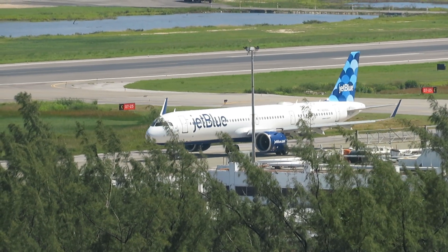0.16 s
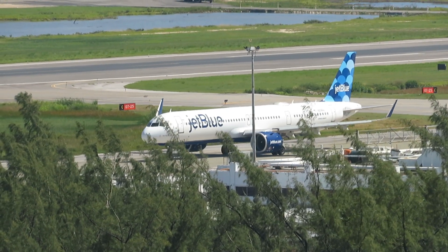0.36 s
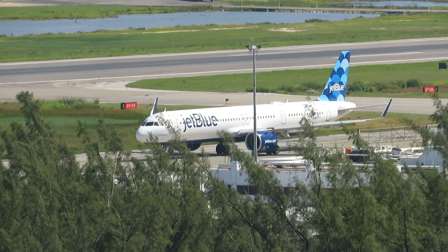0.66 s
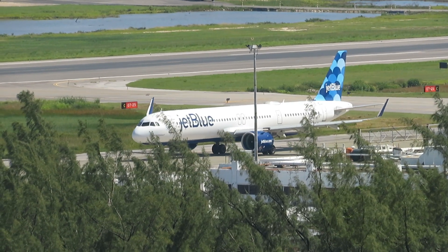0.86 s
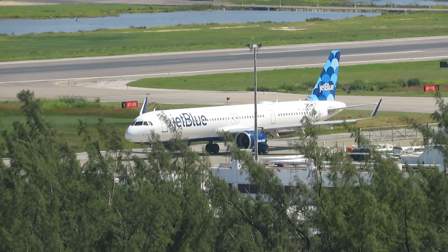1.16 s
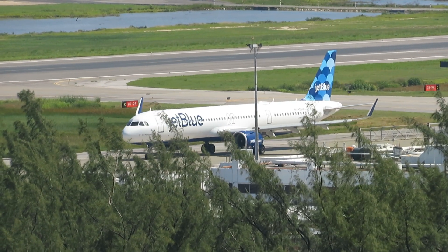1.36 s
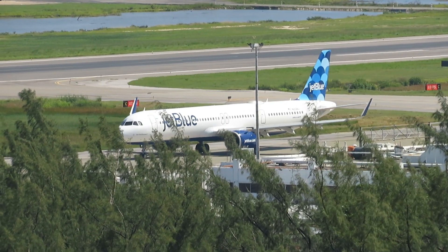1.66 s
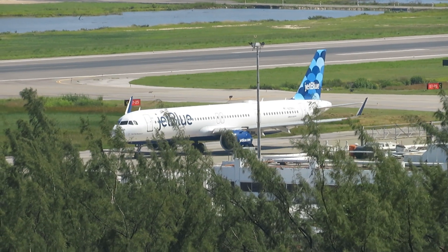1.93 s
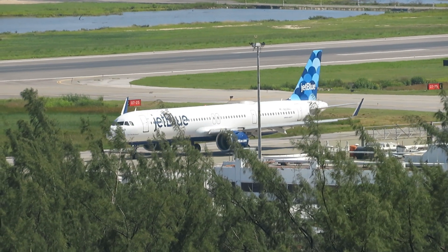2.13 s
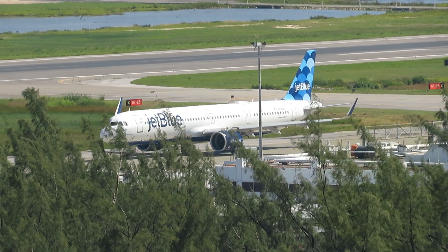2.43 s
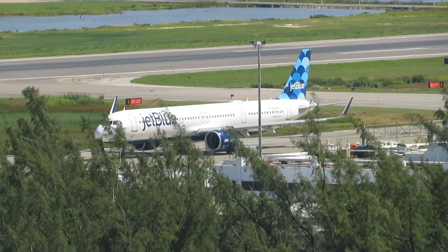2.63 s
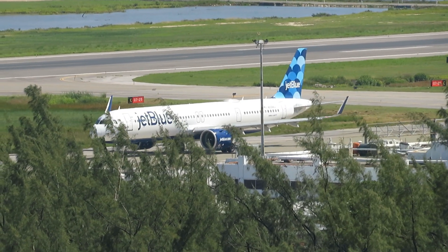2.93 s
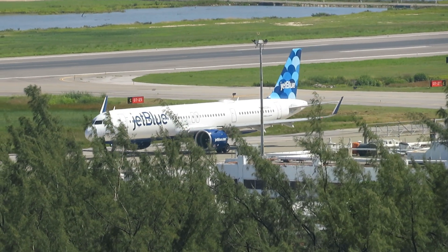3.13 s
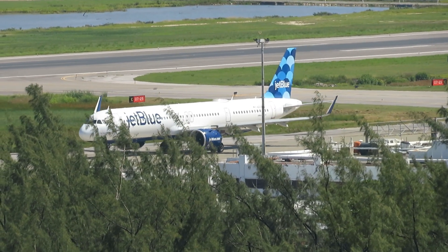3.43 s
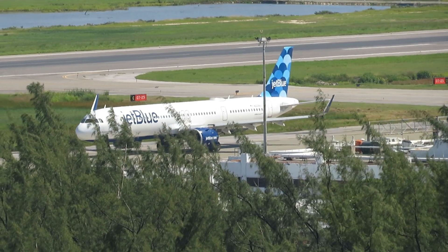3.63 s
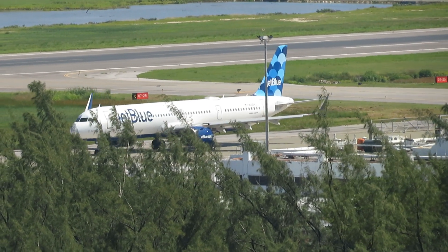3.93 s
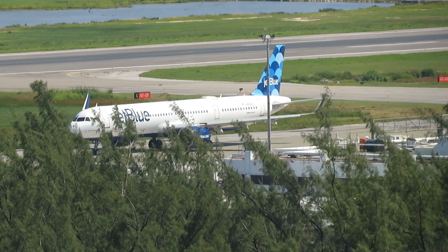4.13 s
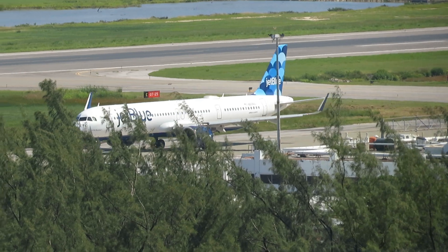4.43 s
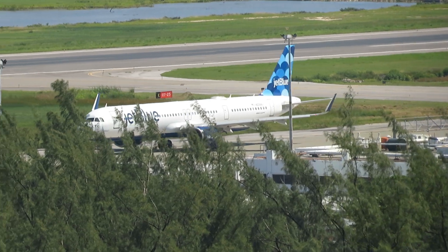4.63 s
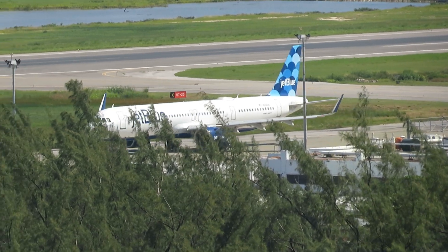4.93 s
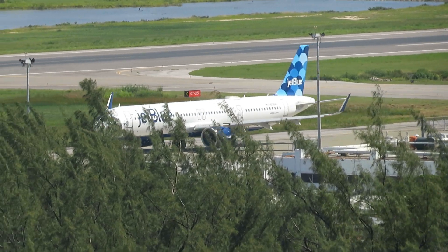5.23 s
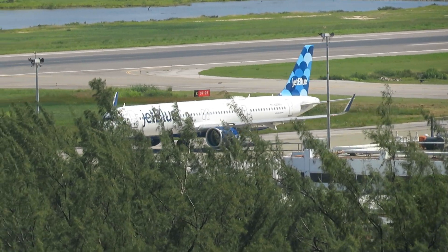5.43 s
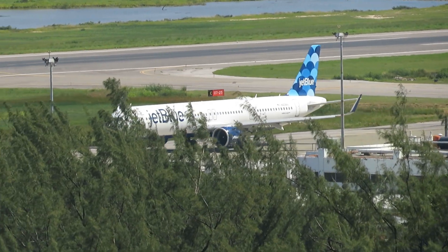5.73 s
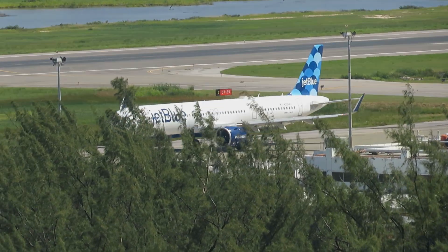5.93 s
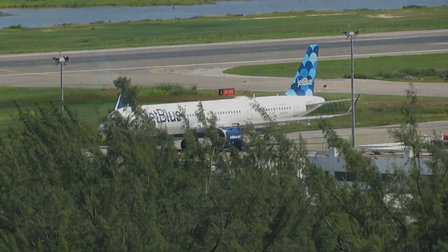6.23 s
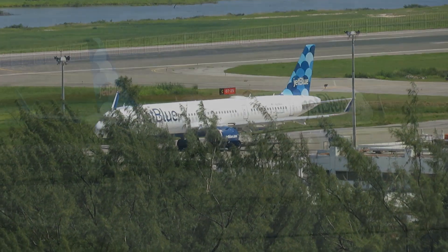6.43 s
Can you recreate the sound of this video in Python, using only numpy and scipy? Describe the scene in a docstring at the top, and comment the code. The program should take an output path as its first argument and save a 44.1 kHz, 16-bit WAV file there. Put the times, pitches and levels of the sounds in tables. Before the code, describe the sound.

Outdoors at some distance, a passenger jet rolls by with its engines running. Low humming drone, fluttering whine and thin breathy whistles blend with turbulent roar and broad hiss. The sound swells as the plane passes, briefly brightens with rushing air, then grows deeper and weaker as it moves off. Brief low wind thumps touch the stereo microphone.

```python
"""A deep engine drone and a fan whine, set in turbulent roar and wide hiss: an airliner taxis
across an airfield, heard from behind a line of trees. Drone and whine are sums of orders of one
unsteady shaft and sink in pitch as the sound moves off. Rumble, roar, rush, hiss and whistles are
shaped noise that swells and fades; puffs of very low noise are wind bumping the microphone."""
import sys
import numpy as np
from scipy import signal
from scipy.fft import rfft, irfft, next_fast_len
from scipy.io import wavfile

SR = 44100
rng = np.random.default_rng(int(sys.argv[2]) if len(sys.argv) > 2 else 0)


def persist_wave(psi):
    """Save psi, clipped to +-1, as 16-bit WAV."""
    counts = np.round(np.clip(psi, -1, 1) * 32767).astype(np.int16)
    wavfile.write(sys.argv[1], SR, np.atleast_2d(counts).T)


N = 289737
TIME = np.arange(N) / SR
SIZE = next_fast_len(N, real=True)
FREQ = np.maximum(np.arange(SIZE // 2 + 1) * SR / SIZE, 1)
OPPOSED = np.array([[1], [-1]])  # left, right in antiphase


def undb(db):
    """Decibels to gain."""
    return 10 ** (np.asarray(db) / 20)


def curves(table):
    """Columns of a table of timed rows, interpolated to one value a sample."""
    t_s, *columns = np.transpose(table)
    return [np.interp(TIME, t_s, column) for column in columns]


def across(points):
    """(f/Hz, value) points joined on a log-frequency axis."""
    hz, value = np.transpose(points)
    return np.interp(np.log(FREQ), np.log(np.sort(hz)), value)


def bell(hz, sigma_hz):
    """Gaussian of height 1 on the frequency axis."""
    return np.exp(-.5 * ((FREQ - hz) / sigma_hz) ** 2)


def pulse(t_s, sigma_s):
    """Gaussian of height 1 on the time axis."""
    return np.exp(-.5 * ((TIME - t_s) / sigma_s) ** 2)


def unit(x):
    """Scale to rms 1."""
    return x / np.std(x)


def white():
    """Spectrum of fresh white noise."""
    return rfft(rng.standard_normal(SIZE))


def filtered(spectrum, gain):
    """Waveform of a spectrum times a gain."""
    return irfft(spectrum * gain, SIZE)[:N]


def colour(spectrum, shape_db):
    """Waveform of a spectrum weighted in dB, rms 1."""
    return unit(filtered(spectrum, undb(shape_db)))


def walk(rate_hz):
    """Smooth random curve of Gaussian bandwidth rate_hz, spread 1."""
    count = 4096
    spectrum = rfft(rng.standard_normal(count))
    hz = np.arange(len(spectrum)) / TIME[-1]
    slow = irfft(spectrum * np.exp(-.5 * (hz / rate_hz) ** 2))
    return np.interp(TIME, np.linspace(0, TIME[-1], count), unit(slow))


def tone(phase, scatter, rate_hz):
    """Line arriving directly and by shifting paths that blur its level and phase."""
    blur = scatter * (walk(rate_hz) * np.sin(phase) + walk(rate_hz) * np.cos(phase))
    return (np.sqrt(2) * np.sin(phase) + blur) / np.sqrt(1 + scatter ** 2)


def breathy(hz, sigma_hz):
    """Noise band around a centre that may move: low noise on two quadrature carriers, rms 1."""
    phase = 2 * np.pi * np.cumsum(hz) / SR
    a, b = (unit(filtered(white(), bell(0, sigma_hz))) for _ in range(2))
    return a * np.sin(phase) + b * np.cos(phase)


def eddies(spectrum, shape_db, swell_db, flicker_db):
    """Turbulent noise that swells slowly and flickers as the air moves."""
    return colour(spectrum, shape_db) * undb(swell_db * walk(1.0) + flicker_db * walk(8.2))


def flares(table):
    """Noise bands that swell and sink, drifting a little in pitch."""
    total = 0
    for t_s, sigma_s, hz, sigma_hz, level_db in table:
        band = breathy(hz * (1 + .008 * walk(2.2)), sigma_hz)
        total = total + undb(level_db) * pulse(t_s, sigma_s) * band
    return total


# beaming per layer: top/dB, rise/(dB/s), top reached t/s, top left t/s, fall/(dB/s)
LAYER_BEAMS = { "throb": (-39, 2, 0, 1.5, 9), "fourth": (-32, 5, 0, 3.5, 3),
               "rumble": (-22, 1, 1.98, 3.5, 3), "abeam": (-40.5, 20, 4, 5.5, 8),
               "wake": (-35.5, 5.5, 4.5, 7, 9), }


def beam(name):
    """Level of a beamed layer in dB: rise, hold and fall, then a fade common to these layers."""
    top_db, rise, reached_s, left_s, fall = LAYER_BEAMS[name]
    fade_s, fade_db_per_s = 5.76, 10
    level_db = top_db - rise * np.maximum(reached_s - TIME, 0) - fall * np.maximum(TIME - left_s, 0)
    return level_db - fade_db_per_s * np.maximum(TIME - fade_s, 0)


# wind bumps on the microphone: t/s, level/dB, sigma/s
WIND_BUMPS = [(0.386, -36.5, 0.057), (2.018, -29, 0.077), (3.634, -27.5, 0.041), (3.98, -33.5, 0.027)]


def wind():
    """Short soft puffs of very low noise."""
    puffs = sum(undb(level_db) * pulse(t_s, sigma_s) for t_s, level_db, sigma_s in WIND_BUMPS)
    shape_db = across([(12, -6.5), (30, 0.5), (55, 13.0), (120, -17), (400, -71)])
    return puffs * colour(white(), shape_db)


# faint high noise band: f/Hz, relative density/dB
HIGH_BAND_SHAPE = [(6000, -24), (9500, -2), (11000, 1), (12500, -17)]


def high_band():
    """Faint high noise band, about 9 to 11 kHz, swelling near 5.5 s."""
    return undb(-68) * pulse(5.55, .4) * colour(white(), across(HIGH_BAND_SHAPE))


# aspect: t/s, 0 coming - 1 leaving, wide hiss over centre hiss curve/dB
ASPECT_CURVE = [(0, 0, 13.5), (3.6, 0, 15.5), (4.2, 0.63, 16.5), (4.8, 0.81, 18), (5.5, 1, 13.5),
                (6.57, 0.99, 15.5)]


def leaving_share():
    """Share of the leaving colour, 0 coming to 1 leaving."""
    return np.clip(curves(ASPECT_CURVE)[0], 0, 1)


# rush of air: f/Hz, relative density/dB
RUSH_SHAPE = [(500, -23), (850, -3), (1100, 2.5), (1350, -1.5), (1850, -6.5), (2300, -9.5), (3200, -20),
              (3850, -18), (4400, -38.5), (7000, -87), (12000, -83)]
# resonances: f/Hz, sigma coming/Hz, sigma leaving/Hz, lift coming/dB, lift leaving/dB
RUSH_RESONANCES = [(1470, 70, 250, 4, 6), (2163, 390, 175, 1.5, 11.5), (2700, 163, 98, 9, -12.5),
                   (3060, 93, 90, 8, -10), (3400, 70, 180, 7, 4.5)]
# rush: t/s, level before trim/dB
RUSH_CURVE = [(0, -31.5), (.5, -33), (1.5, -31.5), (1.8, -34), (2.35, -31), (2.85, -30), (3.2, -27.5),
              (3.9, -26), (4.3, -30), (4.8, -33), (5.4, -36.5), (5.7, -42.5), (6.57, -49.5)]
# centre hiss: f/Hz, relative density/dB
HISS_SHAPE = [(1500, -11.5), (3000, 8), (3800, 8.5), (4500, 3.5), (5800, 6.5), (7000, 3), (8300, 0),
              (9500, -5.5), (11000, -24), (13000, -39)]
# hiss: t/s, level before trim/dB
HISS_CURVE = [(0, -53.5), (1.45, -49.5), (1.9, -51.5), (2.5, -50.5), (3.3, -52), (3.95, -51), (4.4, -54.5),
              (5, -55.5), (5.4, -53), (5.7, -59), (6, -64.5), (6.57, -76)]
# treble differing between the ears, coming and leaving: f/Hz, relative density/dB
WIDE_SHAPE_COMING = [(1300, -57), (2050, -14.5), (2300, -9), (2420, -6), (2600, -1.5), (2820, -1),
                     (3050, -6), (3300, -6.5), (3620, -9.5), (3880, -3.5), (4150, 1), (4450, -2),
                     (4700, -1.5), (4980, 2), (5280, -13), (5550, -4), (6150, -10), (6700, -8),
                     (7300, -16.5), (9300, -16), (12500, -46.5)]
WIDE_SHAPE_LEAVING = [(1600, -56.5), (2100, -9.5), (2350, -2), (2600, -8), (2850, 3), (3250, -4),
                      (3700, -13), (4250, -5), (4600, -15.5), (4950, 1), (5500, -3.5), (5900, -12),
                      (6400, -15.5), (9000, -20), (11000, -35), (12500, -39)]
# phase turn of the centre's noise for the wide treble: f/Hz, phase/rad
WIDE_PHASE_CURVE = [(2550, -2.5), (2830, 3.5), (3000, -6), (3250, 4.5), (3480, 0), (3750, -2), (4600, 4),
                    (5500, -1.94), (10000, -1.53)]


def rush():
    """Resonant rushing air and hiss as (centre, side), changing colour with aspect."""
    hiss_db, = curves(HISS_CURVE)
    rush_db, = curves(RUSH_CURVE)
    wide_db = curves(ASPECT_CURVE)[1]
    leaving = leaving_share()
    noise = white()
    coming_db = sum(db * bell(hz, sigma) for hz, sigma, _, db, _ in RUSH_RESONANCES)
    leaving_db = sum(db * bell(hz, sigma) for hz, _, sigma, _, db in RUSH_RESONANCES)
    front = colour(noise, across(RUSH_SHAPE) + coming_db)
    rear = colour(noise, across(RUSH_SHAPE) + leaving_db)
    centre = undb(rush_db + 1.0) * ((1 - leaving) * front + leaving * rear)
    centre += undb(hiss_db + 4.0) * colour(noise, across(HISS_SHAPE))
    # the centre's noise with its phase turned by frequency, plus independent noise
    turned = noise * np.exp(1j * across(WIDE_PHASE_CURVE)) + .9 * white()
    wide = (1 - leaving) * colour(turned, across(WIDE_SHAPE_COMING))
    wide += leaving * colour(turned, across(WIDE_SHAPE_LEAVING))
    side = undb(hiss_db + wide_db) * wide * OPPOSED
    flutter = undb(.5 * walk(22) + 0.63 * walk(9.4))
    return centre * flutter, side * flutter


# exhaust rumble, roar and swell abeam: f/Hz, relative density/dB
RUMBLE_SHAPE = [(20, -28), (45, -21), (95, -7), (130, -7), (200, -2), (260, -1.5), (330, -2.5), (420, -6),
                (600, -18.5), (1200, -81), (5000, -110)]
ROAR_SHAPE = [(250, -10.5), (400, 1.5), (500, -4), (700, -0.5), (850, -2), (1000, -12), (1400, -29.5),
              (3000, -89.5), (8000, -100)]
ABEAM_SWELL_SHAPE = [(200, -31.5), (550, -18), (950, -2), (1300, -2.5), (1850, -11), (2700, -18.5),
                     (3600, -31.5), (4400, -17.5), (9000, -81.5)]
# roar: t/s, level before trim/dB
ROAR_CURVE = [(0, -25.5), (.8, -24.5), (1.8, -26.5), (2.15, -24.5), (2.75, -31), (3.45, -26.5), (4, -23),
              (4.5, -29), (5.1, -31), (5.6, -35.5), (6.57, -44.5)]


def exhaust():
    """Turbulent exhaust noise, brighter abeam and deeper from behind."""
    rumble = undb(beam("rumble") + .4) * eddies(white(), across(RUMBLE_SHAPE), 0.16, 1.24)
    roar = undb(curves(ROAR_CURVE)[0] + 3.5) * eddies(white(), across(ROAR_SHAPE), 0.24, 0.93)
    abeam = undb(beam("abeam")) * eddies(white(), across(ABEAM_SWELL_SHAPE), .16, 0.85)
    wake_shape_db = across([(40, -44.5), (80, -4.0), (115, 2.5), (145, -8.0), (190, -10.5),
                            (280, -19.0), (2000, -100)])
    wake = undb(beam("wake")) * colour(white(), wake_shape_db)
    return rumble + roar + abeam + wake


# valleys in the approaching noise: f/Hz, sigma/Hz, gain/dB
NOISE_VALLEYS = [(664, 16, -3.5), (1340, 31, -3), (1845, 20, -7.5), (2300, 20, -3), (3000, 25, 0),
                 (3310, 50, -3.5), (4450, 110, -5)]


def hollow(x):
    """Narrow spectral valleys colour the noise while the engine comes and fill in as it leaves."""
    leaving = leaving_share()
    valley_db = sum(db * bell(hz, sigma_hz) for hz, sigma_hz, db in NOISE_VALLEYS)
    carved = filtered(rfft(x, SIZE), undb(valley_db))
    return (1 - leaving) * carved + leaving * x


# exhaust lumps: t/s, sigma/s, f/Hz, sigma/Hz, level/dB
RUMBLE_LUMPS = [(.38, 0.053, 263, 8, -20.5), (.58, .03, 200.5, 12, -24), (.71, .035, 252, 13, -19.5),
                (.89, 0.016, 222, 15, -16), (1.68, .08, 260, 5.9, -19.5), (2.33, 0.044, 244.5, 20, -25),
                (2.62, 0.029, 225, 30, -22), (3.3, 0.049, 207.8, 12, -25), (3.75, 0.042, 197, 8.8, -22.5),
                (3.93, 0.024, 226.6, 17.3, -21.5), (4.11, 0.038, 238, 14, -22), (5.52, .04, 230, 10, -27.5)]


def lumps():
    """Brief narrow bands of low noise make the exhaust's rumble lumpy."""
    return flares(RUMBLE_LUMPS)


# rush resonances flaring as the engine turns: t/s, sigma/s, f/Hz, sigma/Hz, level/dB
RUSH_FLARES = [(1.3, 0.34, 1481, 45.4, -38.5), (1.52, 0.12, 3600, 80.2, -48), (1.55, 0.2, 3820, 90, -48),
               (2.5, 0.13, 3712, 180.9, -45.5), (3.168, 0.1, 2670, 132.3, -37),
               (3.468, 0.17, 3430, 74.6, -43), (5.42, 0.11, 3480, 90, -52), (5.42, 0.1, 3920, 89.7, -53)]
# brief surges of the wide hiss: t/s, sigma/s, f/Hz, sigma/Hz, level/dB
WIDE_SURGES = [(.9, .2, 6800, 170.5, -50), (1.47, .15, 4900, 200, -40), (1.62, .22, 4050, 120, -42),
               (2.55, 0.17, 4118, 110, -42), (3.22, 0.16, 4200, 120.3, -44.5),
               (4.02, 0.13, 3143, 230, -41.5), (5.27, 0.13, 3210, 190, -46)]


def resonance_flares():
    """Noise bands flare briefly: resonances in the centre, wide hiss in antiphase."""
    return flares(RUSH_FLARES) + flares(WIDE_SURGES) * OPPOSED


# airy whistle: t/s, mean f/Hz, mean level/dB
WHISTLE_CURVE = [(0, 2096, -43), (.2, 2070, -38.5), (.55, 2107, -38.5), (1.1, 2102, -37.5),
                 (1.43, 2105, -35), (1.78, 2087, -44), (2.1, 2139, -37), (2.5, 2160, -34), (2.9, 2105, -44),
                 (3.5, 2094, -33.5), (4.15, 2108, -40), (4.7, 2100, -37.5), (5.1, 2104, -43),
                 (5.9, 2101, -46.5), (6.57, 2070, -71)]


def whistle():
    """Airy whistle: a noise band that wanders in pitch and wavers in level."""
    hz, level_db = curves(WHISTLE_CURVE)
    sigma_hz, waver_db = 64, 1
    level_db = level_db + waver_db * walk(6.7)
    return undb(level_db) * breathy(hz * (1 + 0.00599 * walk(4.94)), sigma_hz)


# compressor whines: mean f/Hz, sigma/Hz, peak level before waver/dB
COMPRESSOR_WHINES = [(1452, 17, -42), (1537, 15, -45.5), (2656, 28, -45), (3020, 23, -47),
                     (3530, 39, -50.5)]


def compressor():
    """Thin whines that waver independently, strongest as the intake faces the listener."""
    peak_s, fall_db_per_s, wander, waver_db = 1.45, 5.5, .009, 3
    facing_db = -fall_db_per_s * np.abs(TIME - peak_s)
    total = 0
    for hz, sigma_hz, peak_db in COMPRESSOR_WHINES:
        level_db = peak_db + facing_db + waver_db * walk(5.3)
        total = total + undb(level_db) * breathy(hz * (1 + wander * walk(5.4)), sigma_hz)
    return total


# engine speed as heard: t/s, mean blade tone f/Hz
BLADE_HZ_CURVE = [(0, 407), (.17, 403), (.35, 410), (.5, 406.2), (.64, 410.6), (.8, 405), (.98, 410),
                  (1.12, 409), (1.35, 413.5), (1.9, 415.2), (2.3, 410.5), (2.7, 403), (3.3, 399.8),
                  (4, 388.1), (4.6, 378.8), (5.3, 368.3), (5.8, 357.8), (6.57, 348.3)]
# blade tone, second and third harmonic: t/s, level before trim/dB
BLADE_CURVE = [(0, -27), (.84, -17), (.94, -33.5), (1.13, -23), (1.28, -21), (1.58, -19.5), (1.85, -22),
               (2.28, -18), (2.62, -17.5), (3.17, -22.5), (3.3, -14), (3.52, -28), (3.72, -14.5),
               (3.95, -32.5), (4.4, -18), (4.65, -21), (5.05, -27), (5.5, -27), (5.7, -25.5), (5.95, -34),
               (6.5, -41)]
SECOND_CURVE = [(0, -22.5), (.7, -22.5), (1.15, -24), (1.3, -31.5), (1.5, -24), (1.85, -33), (2.15, -28.5),
                (2.35, -43), (2.55, -31), (2.68, -40), (2.85, -24.5), (3.1, -31), (3.42, -25.5),
                (3.55, -33), (3.78, -26.5), (3.87, -18), (3.97, -25.5), (4.17, -20.5), (4.25, -27),
                (4.33, -23), (4.43, -33), (4.68, -25), (4.77, -36), (5.08, -31), (5.4, -38), (6.57, -58)]
THIRD_CURVE = [(0, -50), (.7, -37.5), (1.3, -44), (2.5, -46), (2.95, -34.5), (3.29, -28), (3.7, -28.5),
               (4, -35.5), (5.2, -40.5), (6.57, -52)]


def whine(fan_phase):
    """Blade tone and second harmonic blur once the engine has gone by; the third is a noise band."""
    scatter = np.interp(TIME, (4.2, 5.4), (.14, .75))  # between these s
    blade = undb(curves(BLADE_CURVE)[0] - 2) * tone(fan_phase, scatter, 14)
    second_scatter = scatter + 2.5 * scatter ** 2
    second = undb(curves(SECOND_CURVE)[0] - 1.2) * tone(2 * fan_phase, second_scatter, 16)
    third_hz = 3 * curves(BLADE_HZ_CURVE)[0] - 10
    third = undb(curves(THIRD_CURVE)[0] - .5) * breathy(third_hz, 42)
    return blade + second + third


# drone: t/s, level before trim/dB
DRONE_CURVE = [(0, -21), (.6, -22.5), (1.5, -19), (1.7, -23.5), (1.9, -20.5), (2.35, -24), (2.55, -19.5),
               (2.9, -23.5), (3.1, -17), (4.65, -20), (5.2, -26), (5.65, -36.5), (6.08, -44), (6.5, -35)]
# drone's octave: t/s, level/dB
OCTAVE_CURVE = [(0, -36), (1.05, -34.5), (1.2, -24), (1.35, -32.5), (1.48, -24), (1.7, -35), (2.4, -26),
                (2.7, -31), (3.55, -27.5), (3.8, -29), (4.7, -33.5), (5.1, -25.5), (5.65, -38),
                (6.57, -46.5)]
# growl, a low order that surges: t/s, level/dB
GROWL_CURVE = [(0, -28), (1, -28), (1.5, -36), (1.7, -23.5), (2.5, -27), (2.8, -30.5), (4.1, -32),
               (4.4, -34), (5.6, -36), (6.57, -41)]


def drone(turn):
    """Deep note with its octave; weaker shaft orders give it a coarse edge."""
    note = undb(curves(DRONE_CURVE)[0] - 0.2) * tone(turn, 0.14, 3.3)
    octave = undb(curves(OCTAVE_CURVE)[0]) * tone(2 * turn, .2, 7.7)
    throb = undb(beam("throb")) * tone(turn * 2 / 3, .71, 3.7)
    growl = undb(curves(GROWL_CURVE)[0]) * tone(turn * 10 / 3, 2.5, 26)
    fourth = undb(beam("fourth")) * tone(4 * turn, 0.54, 3.8)
    return note + octave + throb + growl + fourth


def engine():
    """Drone and fan whine follow the same slightly unsteady shaft."""
    fan_hz = curves(BLADE_HZ_CURVE)[0] * (1 + 0.0015 * walk(4.8))
    fan_phase = 2 * np.pi * np.cumsum(fan_hz) / SR
    fan_order = 16 / 3  # blade tone over drone frequency
    return drone(fan_phase / fan_order) + whine(fan_phase)


def scene():
    """Wind, rushing air, exhaust, whistles and engine tones summed in stereo."""
    centre, side = rush()
    noise = wind() + high_band() + hollow(exhaust() + centre) + side + lumps()
    return noise + resonance_flares() + whistle() + compressor() + engine()


# port mismatch: f/Hz, half difference re mid/dB
PORT_DIFFERENCE = [(30, -52), (70, -45), (150, -34.5), (400, -29), (650, -68.5)]


def record(dry):
    """The two ports differ slightly in the bass; the recorder cuts the top."""
    top_hz, lag_rad = 12600, .8
    mid = rfft(dry.mean(axis=0), SIZE)
    uneven = filtered(mid, undb(across(PORT_DIFFERENCE)) * np.exp(-1j * lag_rad))
    lowpass = signal.ellip(8, .2, 70, top_hz, fs=SR, output="sos")
    return signal.sosfilt(lowpass, dry + uneven * OPPOSED)


dry = scene()
out = record(dry)
persist_wave(out)
```